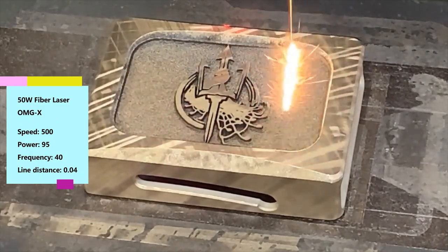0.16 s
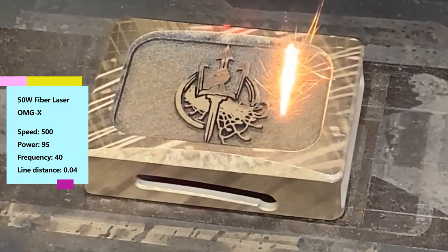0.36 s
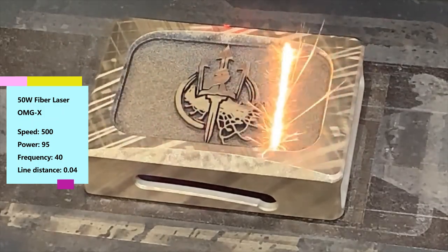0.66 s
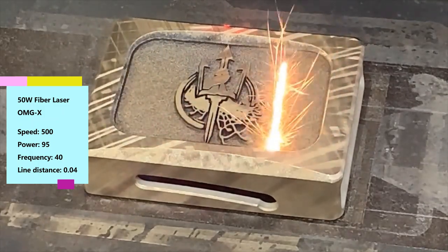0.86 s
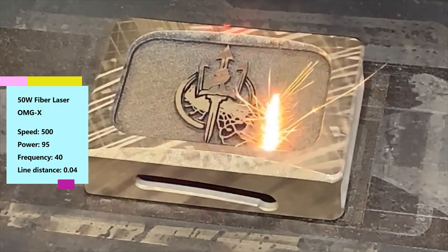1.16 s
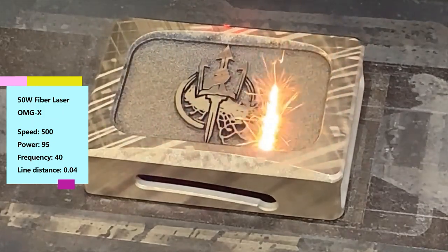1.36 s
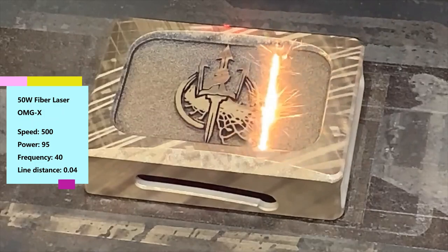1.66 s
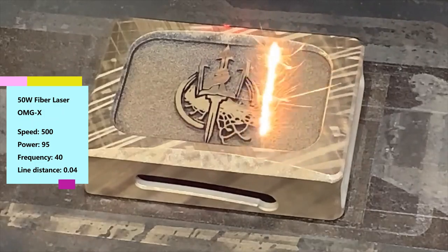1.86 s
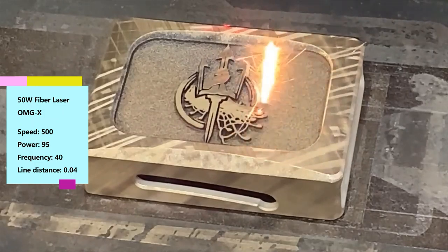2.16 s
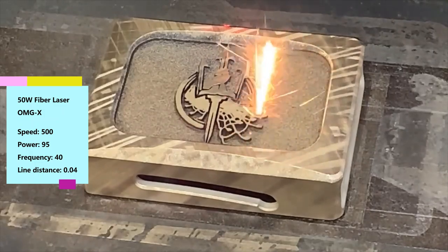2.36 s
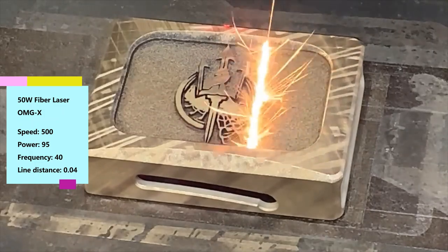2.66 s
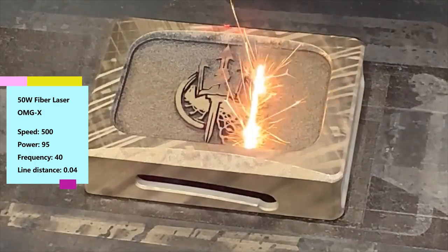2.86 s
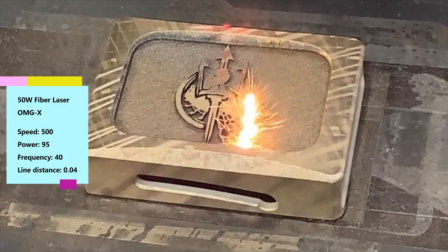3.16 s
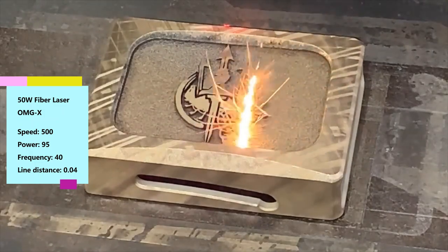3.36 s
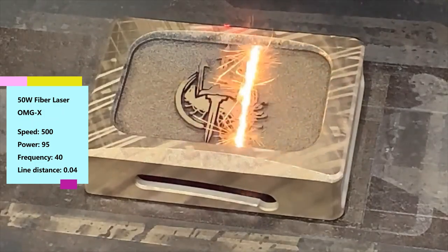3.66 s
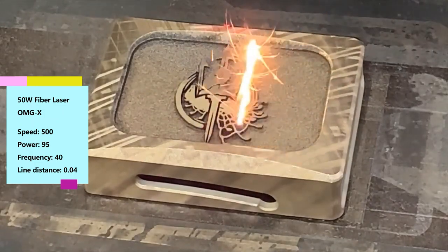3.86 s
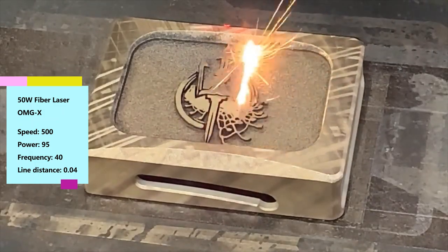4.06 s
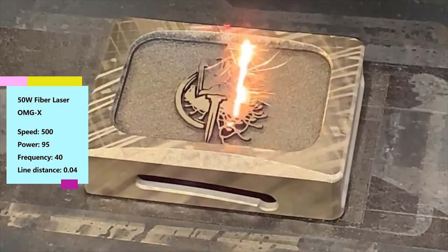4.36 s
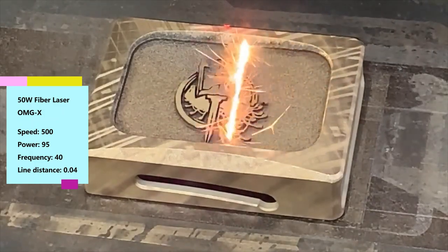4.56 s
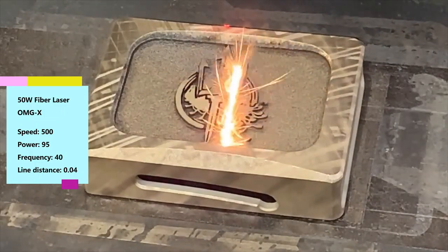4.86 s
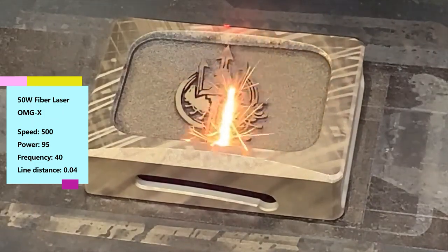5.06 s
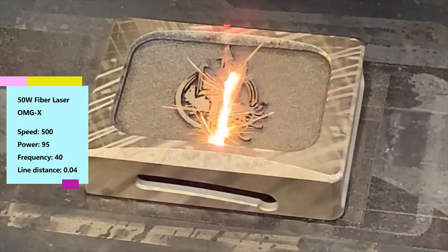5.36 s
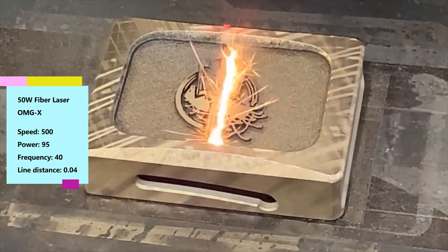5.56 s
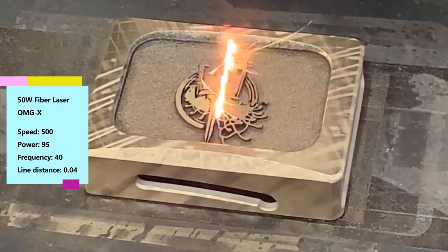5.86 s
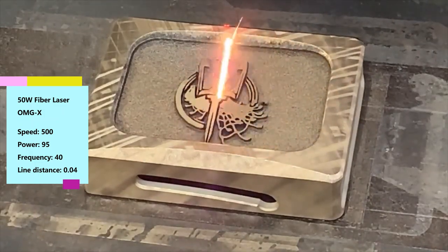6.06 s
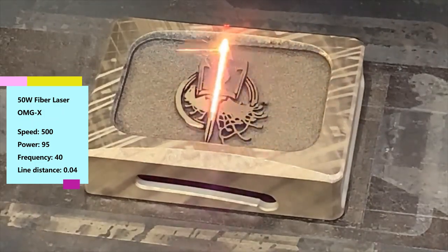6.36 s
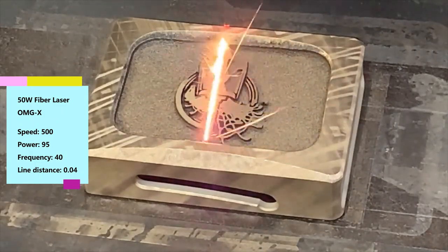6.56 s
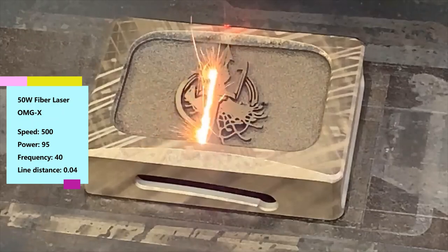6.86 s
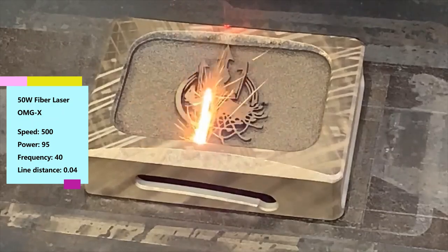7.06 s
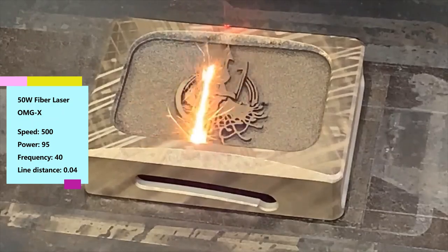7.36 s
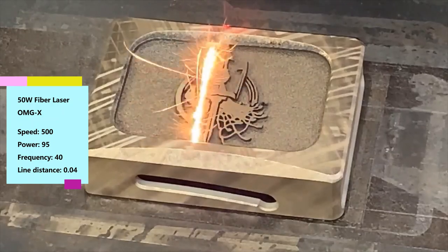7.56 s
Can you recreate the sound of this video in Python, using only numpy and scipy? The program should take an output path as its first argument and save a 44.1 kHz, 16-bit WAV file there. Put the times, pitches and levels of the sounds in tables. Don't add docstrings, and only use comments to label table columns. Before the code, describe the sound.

Close, sizzling plasma hiss flutters rapidly as a beam engraves metal, with tiny sharp spits clustering near six seconds above soft workshop fans.

```python
import sys
import numpy as np
from scipy import signal
from scipy.io import wavfile
from scipy.ndimage import uniform_filter1d, map_coordinates

SR = 44100
rng = np.random.default_rng(int(sys.argv[2]) if len(sys.argv) > 2 else 0)


def unload_audio(sound):
    columns = np.transpose(np.atleast_2d(sound))
    steps = np.round(np.clip(columns, -1, 1) * 32767)
    wavfile.write(sys.argv[1], SR, steps.astype(np.int16))


def voltage_ratio(level):
    return 10 ** (np.asarray(level, float) / 20)


N = 340893
FFT, HOP = 1024, 256
FRAMES = N // HOP + 5


def read(points, hz):
    f, value = np.transpose(points)
    return np.interp(np.log(hz + 1), np.log(f + 1), value)


def follow(rows, t):
    s, *columns = np.transpose(rows)
    return [np.interp(t, s, column) for column in columns]


def rms(x):
    return np.sqrt(np.mean(x ** 2) + 1e-20)


def bell(x):
    return np.exp(-.5 * x ** 2)


def noise_pair(total_db, split_db, lag, patchy_db, wander_db, lean=0):
    a, b, c, d, *fields = rng.standard_normal((FRAMES, FFT // 2 + 1, 6)).T
    fields = uniform_filter1d(np.array(fields), size=6, axis=1)
    fields = uniform_filter1d(fields, size=11, axis=2)
    patches, wander = fields / rms(fields)
    mid_share = 1 / (1 + voltage_ratio(-2 * (split_db + wander_db * wander)))
    lag = np.clip(lag, -1, 1)
    mid = a + 1j * b
    side = (lean - 1j * lag) * mid + np.sqrt(1 - lag ** 2) * (c + 1j * d)
    z = np.array([mid * np.sqrt(mid_share), side * np.sqrt(1 - mid_share)])
    z = z * voltage_ratio(total_db + patchy_db * patches)
    return signal.istft(z, nperseg=FFT, noverlap=FFT - HOP)[1][:, :N]


# time_s, level_db
BURN_STRENGTH = [(0, -26.5), (.3, -26), (1.5, -26.5), (2.1, -25), (2.4, -25.5), (2.65, -25), (3, -27),
                 (3.7, -26), (4.4, -25.5), (4.65, -25), (4.9, -26), (5.3, -24.5), (5.8, -27.5), (6.45, -24),
                 (6.6, -26), (6.75, -26), (7.1, -25), (7.73, -26)]
# middle_s, half_length_s, distance_from_near_end_swings, half_width_swings, change_db
RAISED_AND_HOLLOW = [(3.6, 0.13, 0.41, .025, -1), (3.963, 0.12, 0.16, 0.031, 2),
                     (4.06, 0.069, 0.42, 0.034, -5.5), (4.198, 0.17, 0.19, 0.061, -3),
                     (4.504, 0.1, 0.2, 0.058, -6), (4.6, 0.15, 0.34, 0.022, -3.5),
                     (4.6, 0.25, 0.46, 0.033, 1.5), (4.65, 0.17, 0.12, .025, 4),
                     (5.112, 0.21, 0.29, 0.065, -4), (5.21, 0.034, 0.64, 0.032, 10),
                     (5.95, 0.081, 0.18, 0.084, -5.5), (5.963, .07, 0.37, .1, -0.5),
                     (6.676, 0.066, 0.53, 0.13, 3), (6.11, 0.1, 0.22, .02, 1),
                     (6.136, 0.24, 0.094, 0.1, -6.5), (6.162, 0.049, 0.11, 0.033, 6),
                     (6.296, 0.084, 0.079, 0.037, -5), (6.297, 0.19, 0.34, 0.11, -10),
                     (6.462, 0.04, 0.14, 0.051, -1.5), (6.47, .02, 0.039, 0.043, 4),
                     (6.03, .02, .16, 0.066, -5), (6.04, 0.021, 0.42, 0.11, 2), (6.19, .05, 0.25, 0.058, 4),
                     (5.9, 0.054, 0.14, .04, -7), (5.74, 0.053, 0.079, 0.048, 3),
                     (6.13, .02, 0.52, 0.023, -3), (6.574, 0.097, 0.45, 0.11, -4.5),
                     (6.62, 0.075, 0.12, 0.093, 1), (6.838, 0.041, 0.071, 0.055, 3),
                     (6.558, .02, .4, .08, -6), (6.635, .03, 0.066, .06, 3), (6.435, .015, .05, .08, 3),
                     (7, .012, .03, .06, 2)]
# time_s, roughness_db, duller_hiss_lift_db
RELIEF_DEPTH = [(0, 1, -2.5), (1.5, 1.5, -2.5), (2.1, -0.5, 1), (3, 2.5, 4), (4, 1.5, 1), (5, -0.5, 2.5),
                (5.8, 0.5, 2), (6, 1.5, 1.5), (6.3, -1, 4.5), (6.6, -1.5, -2.5), (6.9, 1, 0.5),
                (7.73, 1.8, 0.5)]


def beam_swell():
    swing_hz, near_turn = 29.462, .61
    linger_db, linger_swings = 2, .24
    t = np.arange(N) / SR
    place = abs((t * swing_hz - near_turn + .5) % 1 - .5)
    swell_db = linger_db * bell(place / linger_swings)
    for s, half_s, at, half_width, db in RAISED_AND_HOLLOW:
        near = slice(round((s - 2 * half_s) * SR), round((s + 2 * half_s) * SR))
        off = ((t[near] - s) / half_s) ** 4 + ((place[near] - at) / half_width) ** 4
        swell_db[near] += db * np.exp(-.5 * off)
    bumps = rng.standard_normal((200, 16))
    bumps = bumps - 1.03 * bumps[:, :12].mean(1, keepdims=True)
    pits = map_coordinates(bumps, [t * 8.2, place * 22.1], order=1)
    roughness_db = follow(RELIEF_DEPTH, t)[0]
    return follow(BURN_STRENGTH, t)[0] + swell_db + roughness_db * pits / rms(pits)


# pitch_hz, level_db per Hz
HISS_COLOUR = [(900, -29.5), (1500, -14.5), (2390, -17), (3000, -9.5), (3850, -9.5), (4350, -5.5),
               (4800, -10), (5700, -1.5), (7300, -1.5), (8500, -1), (9250, 5), (10000, 0.5), (11650, -1.5),
               (11950, -14)]
# early_hz, late_hz, width_hz,
# early_db, late_db
CLAMP_ECHOES = [(2240, 2170, 30, -4.5, -7.5), (2360, 2630, 44, -8.5, -11.5), (3250, 3110, 133, -6.5, -7),
                (3420, 4300, 86, 0.5, 4.5), (4000, 3800, 120, 2.5, -5.5), (4340, 4350, 75, -21.5, -20.5),
                (4660, 5900, 75, -12.5, -5), (4700, 4440, 120, 2.5, 1.5), (5360, 4500, 55, -8, -1.5),
                (5880, 6040, 89, -9.5, -3), (6660, 7190, 130, -8, -1.5), (7640, 8400, 400, -1, -1),
                (1360, 1190, 34, -2.5, -0.5)]


def hiss_colour(hz, t, late):
    colour_db = follow(RELIEF_DEPTH, t)[1] / (1 + (hz / 4900.0) ** 12)
    colour_db = colour_db - 3 * (t - t.mean()) / (1 + (12260.0 / (hz + 1)) ** 20)
    for early_hz, late_hz, width_hz, early_db, late_db in CLAMP_ECHOES:
        off_hz = hz - early_hz - late * (late_hz - early_hz)
        colour_db = colour_db + (early_db + late * (late_db - early_db)) * bell(off_hz / width_hz)
    return read(HISS_COLOUR, hz) + colour_db


# pitch_hz, common_over_opposed_db
PORT_SPLIT = [(1000, 4), (2000, 0), (2900, -1), (4000, -5), (5300, 1), (7000, 2), (8600, 3), (9300, 9),
              (10200, 10.5), (11000, 19)]
# early_hz, late_hz, width_hz, early_db, while_shifting_db, late_db
PATH_NULLS = [(2400, 2380, 170, -9, -12, -7), (3230, 3220, 110, -8, 0, -11),
              (3560, 3870, 120, -14, -4, -12), (4440, 4310, 130, -13, -5, -4), (4850, 4900, 150, 3, 0, -14),
              (6100, 6350, 360, 6.5, 9, 12), (7400, 8050, 170, -15, -7, -10), (8900, 9150, 250, 3, 8, 2),
              (8400, 7300, 300, 2, 2, -2), (6700, 6750, 130, -2, 0, 5), (2900, 2900, 130, 2, -2, 3),
              (4050, 4550, 130, 3.5, 1, 3), (3370, 3550, 80, 4, 2, 2), (4100, 4150, 80, 0, 1, 2)]
# start_s, end_s, from_hz, to_hz, width_hz,
# change_db
PATH_SWEEPS = [(1.95, 2.38, 3600, 4500, 230, -11), (2.3, 3.2, 2600, 3250, 130, -8),
               (2.42, 3.1, 3600, 3900, 110, -8), (3.12, 3.4, 4300, 4400, 200, -6),
               (3.45, 3.65, 3600, 3600, 200, -6), (6.88, 7.1, 3600, 3700, 300, -6),
               (.75, 2, 3400, 3450, 300, -5), (6.55, 8, 7450, 7450, 300, 5), (6.55, 8, 8050, 8050, 200, 8),
               (1, 2, 2350, 2350, 130, -6), (3.15, 3.65, 2350, 2300, 130, -6)]


def port_split(hz, t, late, kept):
    split_db = read(PORT_SPLIT, hz)
    for early_hz, late_hz, width_hz, early_db, shifting_db, late_db in PATH_NULLS:
        off_hz = hz - early_hz - late * (late_hz - early_hz)
        depth_db = np.interp(late, [0, .12, .85, 1], [early_db, shifting_db, shifting_db, late_db])
        split_db = split_db + depth_db * bell(off_hz / width_hz)
    for start, end, from_hz, to_hz, width_hz, db in PATH_SWEEPS:
        part = (t - start) / (end - start)
        off_hz = hz - from_hz - part * (to_hz - from_hz)
        split_db = split_db + db * bell(off_hz / width_hz) * np.exp(-(2 * part - 1) ** 8)
    return split_db * np.where(hz > 5000, kept, .45 + .55 * kept)


def flickering_top(hiss):
    low, high = (signal.sosfiltfilt(signal.ellip(8, .5, 70, edge_hz, fs=SR, output="sos"), hiss, padtype="even")
                 for edge_hz in (11780, 12080))
    gate = np.repeat(rng.random(N // 2048 + 1) < .3, 2048)[:N] * 1.
    return low + (high - low) * uniform_filter1d(gate, size=1024)


# time_s, split_kept_share
GROOVE_SPLIT = [
    (5.86, 1),
    (5.92, .35),
    (6.56, .35),
    (6.63, 1),
]
# pitch_hz, share (-1 to 1)
HISS_LAG = [(1500, 0.36), (2750, .5), (3600, 0.18), (5200, -0.25), (6000, -.2), (6900, .4), (8000, 0.45)]
# pitch_hz, share
HISS_LEAN = [(640, 0), (1150, -.06), (2080, -.06), (3760, .1), (6800, .08), (12300, 0)]


def plasma():
    hz = np.fft.rfftfreq(FFT, 1 / SR)[:, None]
    t = np.arange(FRAMES) * HOP / SR
    late = np.interp(t, (2.0, 3.25), [0, 1])
    split_db = port_split(hz, t, late, follow(GROOVE_SPLIT, t)[0])
    pair = noise_pair(hiss_colour(hz, t, late), split_db, read(HISS_LAG, hz), 2.3, 2.1, read(HISS_LEAN, hz))
    crackle_db = 0.54 + 1.9 * (1 - follow(GROOVE_SPLIT, np.arange(N) / SR)[0])
    jitter = uniform_filter1d(rng.standard_normal(N), size=30) * np.sqrt(30)
    hiss = pair / rms(pair[0]) * voltage_ratio(-1.5 + beam_swell()) * voltage_ratio(crackle_db * jitter)
    return flickering_top(hiss)


# start_s, peak_db
BRIGHT_BURSTS = [(1.2794, -18), (3.8541, -13), (4.5376, -13), (5.9194, -19), (5.9494, -17), (5.9935, -16),
                 (6.0294, -18), (6.0424, -16), (6.0761, -17), (6.1094, -18), (6.1449, -10), (6.1795, -17),
                 (6.1963, -17), (6.2642, -17), (6.2815, -19), (6.2983, -15), (6.3327, -13), (6.3654, -13),
                 (6.3744, -18), (6.3997, -14), (6.4025, -14), (6.4375, -10), (6.4659, -13), (6.4718, -9),
                 (6.4991, -13), (6.5075, -14), (6.5544, -18), (6.5677, -12), (7.5194, -14)]


def bright_bursts():
    length = 300
    out, t = np.zeros((2, N + length)), np.arange(length) / SR
    shape = np.exp(-t / 0.0012) * np.minimum(t / 0.00063, 1)
    puffs = rng.standard_normal((len(BRIGHT_BURSTS), 2, length)) * shape
    puffs = signal.sosfilt(signal.butter(8, [5600., 11800.], "band", fs=SR, output="sos"), puffs)
    side_levels = voltage_ratio([[0], [-5]])
    for (s, db), puff in zip(BRIGHT_BURSTS, puffs):
        start = round(s * SR)
        out[:, start:start + length] += voltage_ratio(db - 3.5) * puff / abs(puff[0]).max() * side_levels
    return out[:, :N]


# pitch_hz, level_db, waver_width_hz, port_lag_rad, steady_over_wavering
FAN_TONES = [(109.4, -50, 11, .15, 1), (183, -55, 22, .25, 1.2), (225, -56, 40, .3, 1.5),
             (405, -60, 35, .4, 1.5), (490, -63, 40, .6, 1.5), (762.3, -55, 10, .7, 2.3),
             (792, -53.5, 5, 1.2, 3.5), (872, -69, 8, .5, 1.5), (1298, -66, 14, .4, 1.2),
             (1619, -66, 20, .4, 1.2)]
# middle_s, half_length_s, pitch_hz, lift_db
FAN_SURGES = [(0.346, 0.083, 109, 4), (.8, 0.17, 109, 4), (1.1, 0.075, 109, 6), (1.35, 0.082, 109, 8),
              (2.25, 0.11, 109, 4), (4.65, 0.031, 109, 5), (4.9, 0.056, 109, 6), (5.4, 0.12, 109, 6),
              (5.7, 0.12, 109, 4), (6.753, 0.091, 109, 5), (0.777, 0.045, 225, 11), (7.443, 0.056, 225, 14),
              (7.35, 0.084, 405, 13)]


def fans():
    t, out = np.arange(N) / SR, np.zeros((2, N))
    step = 64
    for hz, db, width_hz, lag, steady in FAN_TONES:
        r = np.exp(-np.pi * width_hz * step / SR)
        drift = rng.standard_normal((N // step + 1, 2)) @ [1, 1j]
        waver = signal.lfilter([1], [1, -2 * r, r * r], drift)
        waver = np.interp(t, t[::step], waver / rms(abs(waver)) + steady)
        tone = waver * np.exp(2j * np.pi * hz * t)
        surge_db = 0
        for s, half_s, surge_hz, up_db in FAN_SURGES:
            if abs(surge_hz - hz) < hz / 10:
                surge_db = surge_db + up_db * bell((t - s) / half_s)
        ports = np.array([tone.real, (tone * np.exp(1j * lag)).real])
        out += voltage_ratio(db + surge_db) / rms(tone.real) * ports
    return out


# pitch_hz, level_db per Hz
AIR_COLOUR = [(15, -59), (25, -25), (69, -45), (87, -7.5), (108, -4), (139, -3), (221, -2.5), (344, -10),
              (386, -6), (601, -14.5), (772, -11.5), (1180, -19), (1270, -14.5), (2300, -32.5), (3050, -39),
              (5500, -120)]
# pitch_hz, common_over_opposed_db
AIR_SPREAD = [(60, 35), (150, 83), (300, 23.5), (700, -5), (1000, 3.5), (1350, 13), (1900, 28), (2400, 27)]


def workshop_air():
    hz = np.fft.rfftfreq(FFT, 1 / SR)[:, None]
    pair = noise_pair(read(AIR_COLOUR, hz), read(AIR_SPREAD, hz), lag=0.25, patchy_db=1.0, wander_db=8.0)
    return voltage_ratio(-42) * pair / rms(pair[0])


def scene():
    mid, side = plasma() + bright_bursts() + workshop_air()
    return np.array([mid + side, mid - side]) + fans()


def band_limit(x):
    return signal.sosfilt(signal.butter(12, 12840, fs=SR, output="sos"), x)


def record(dry):
    thin = signal.sosfilt(signal.butter(2, 52., "high", fs=SR, output="sos"), dry)
    return band_limit(thin)


dry = scene()
out = record(dry)
unload_audio(out)
```